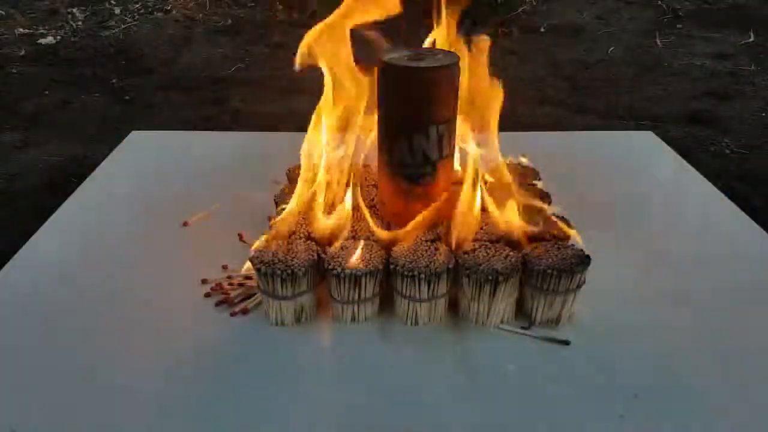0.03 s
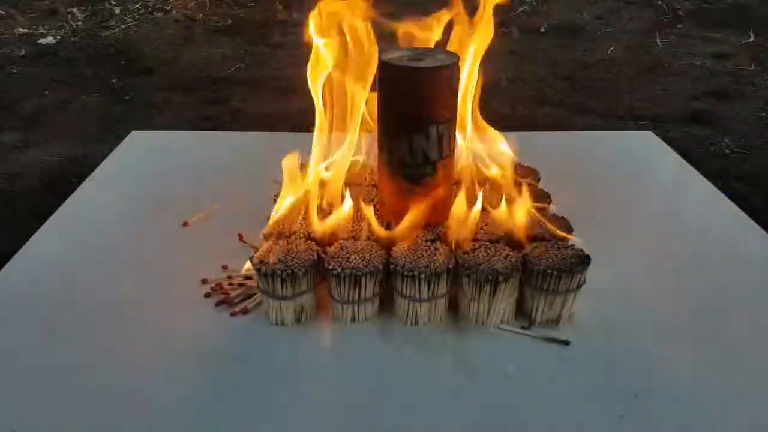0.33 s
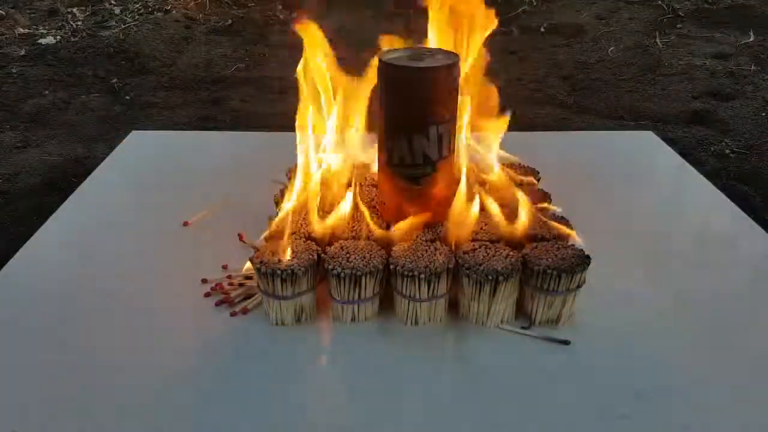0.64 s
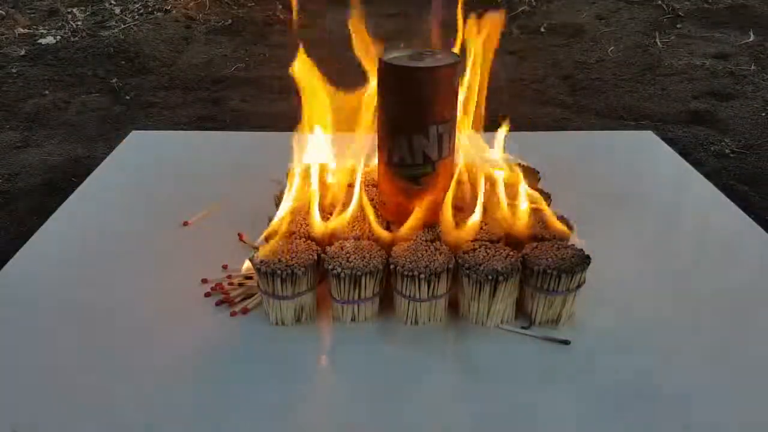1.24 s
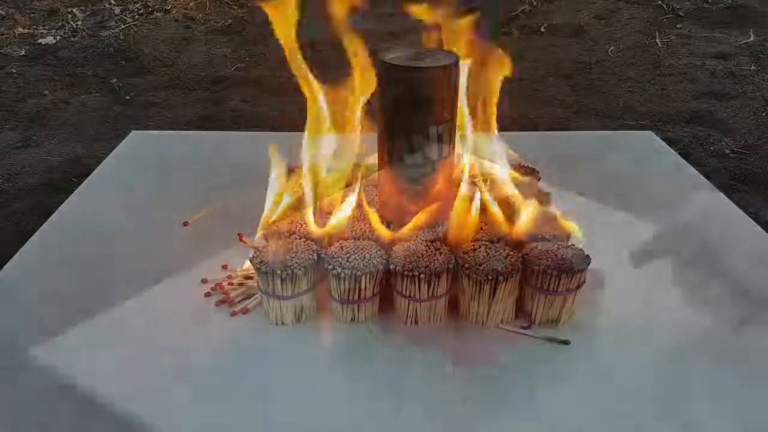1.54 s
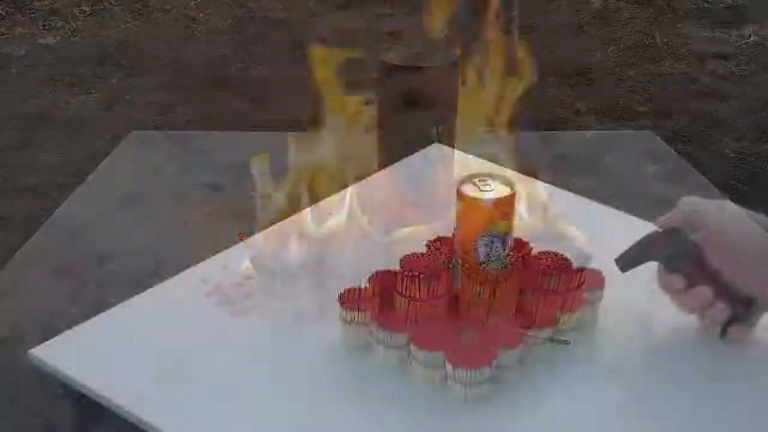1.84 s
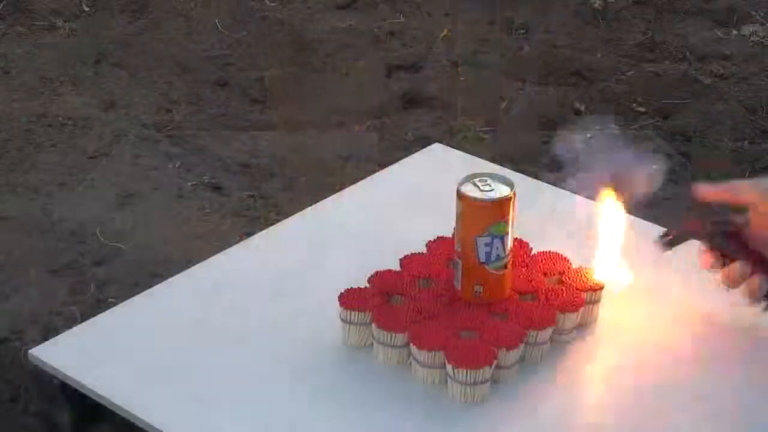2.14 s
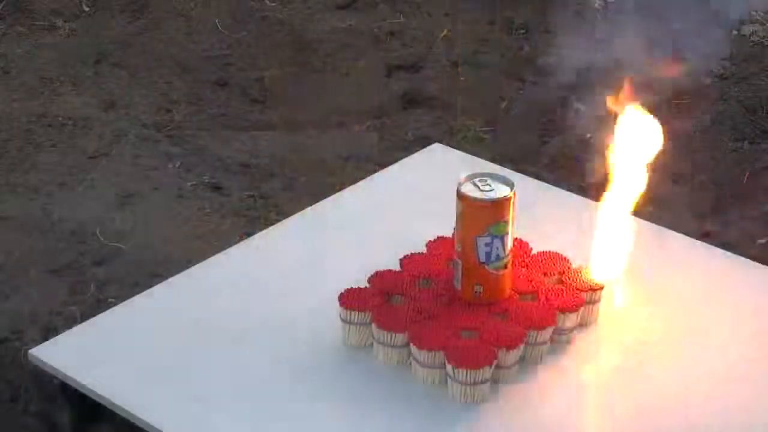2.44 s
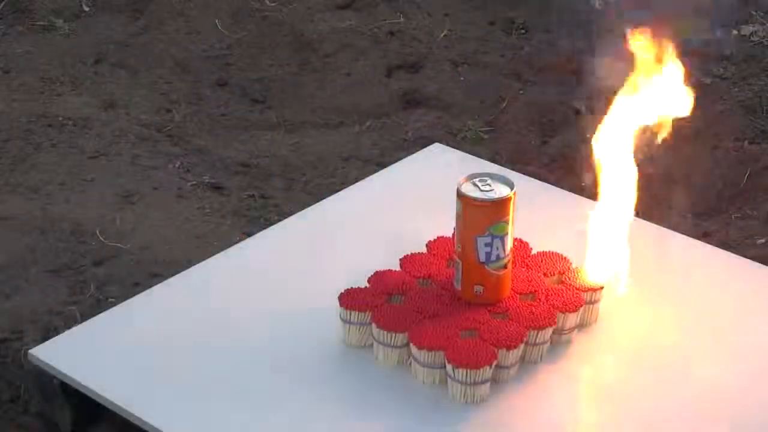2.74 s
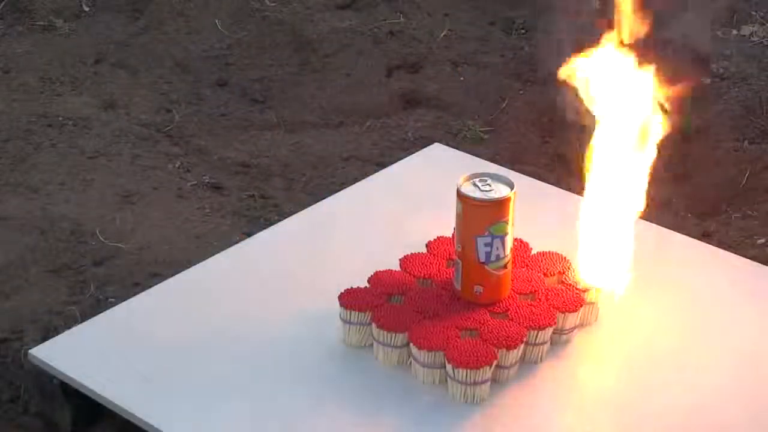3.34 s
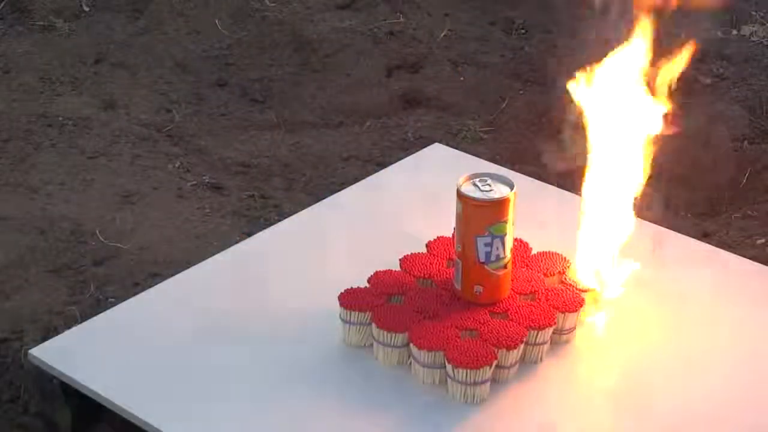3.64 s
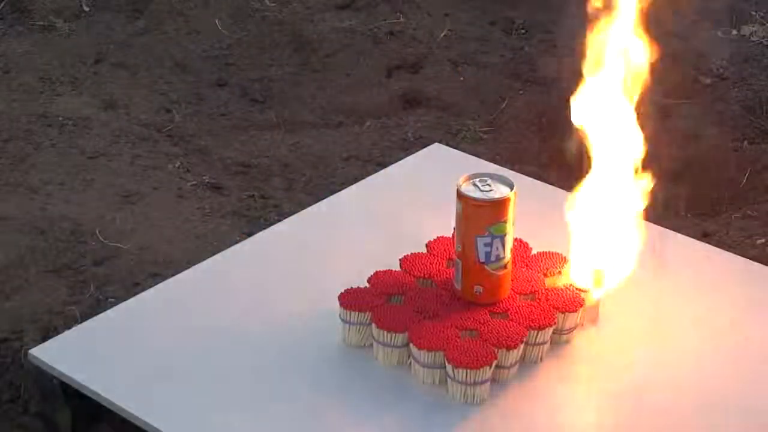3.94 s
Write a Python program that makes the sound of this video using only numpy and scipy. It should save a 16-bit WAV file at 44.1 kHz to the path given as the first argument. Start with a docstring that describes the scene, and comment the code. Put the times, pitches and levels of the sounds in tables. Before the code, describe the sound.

Match heads ignite one after another, close by in the open air. Quiet flame flutter and a few ticks come first, then a lighter's click, a fizz and a pop that grows into a sputtering roar.

```python
"""Bundles of matches burn down on a table outdoors: soft flame flutter, a few ticks, a faint low hum.
At 1.8 s a lighter clicks and rasps, and fresh match heads start to fizz. They catch with a sharp pop
at 2.2 s and the flame leaps up with a hollow whump. From there on, head after head ignites in a
hissing, snapping, roaring jet, coloured by the hard surfaces around it; near the end the roar swoops."""
import sys
import numpy as np
from scipy import signal
from scipy.fft import rfft, irfft, next_fast_len
from scipy.io import wavfile
from scipy.ndimage import map_coordinates

SR = 44100
rng = np.random.default_rng(int(sys.argv[2]) if len(sys.argv) > 2 else 0)


def dump_mix(stems):
    """Bounce the given channels to the path in sys.argv[1] as a 16-bit WAV at rate SR."""
    frames = np.atleast_2d(stems).T  # one column per channel
    limited = np.clip(frames, -1, 1)  # hard clip at full scale
    pcm = np.round(limited * 32767).astype(np.int16)
    wavfile.write(sys.argv[1], SR, pcm)


N = 176400

# stereo image of the close sources, nearly mono: f/Hz, left-right likeness
NARROW = [(100, .998), (400, 0.99), (1300, 0.96), (2400, 0.97), (4400, 0.92), (12000, 0.98)]
# stereo image of the background, open in the treble: f/Hz, left-right likeness
WIDE = [(60, 1), (200, 0.9), (400, 0.49), (800, 0.16), (2000, 0.099), (6000, 0.11), (12000, 0.18)]


def amp(db):
    """Decibels to gain."""
    return 10 ** (np.asarray(db) / 20)


def unit(x):
    """Scale to rms 1."""
    return x / np.sqrt(np.mean(x ** 2) + 1e-20)


def along(points, hz):
    """Read a curve of (f/Hz, value) points on a log frequency axis."""
    f, v = np.transpose(points)
    return np.interp(np.log(hz + 1), np.log(f + 1), v)


def since(s):
    """Seconds since s, for every sample."""
    return np.arange(N) / SR - s


def fader(points):
    """Gain per sample from (t/s, level/dB) points."""
    return amp(np.interp(since(0), *np.transpose(points)))


def pan_right(db):
    """Stereo gains: left down and right up by db."""
    return amp(db * np.array([[-1], [1]]))


def wobble(per_s):
    """A smooth random curve with per_s knots a second."""
    return map_coordinates(rng.standard_normal(2000), [since(0) * per_s], mode="wrap")


def burst(s, rise, hold, t60):
    """Envelope from s: linear rise, exponential release after hold; all in seconds."""
    t = since(s)
    return np.clip(t / rise, 0, 1) * np.exp(-np.log(1000) * np.maximum(t - hold, 0) / t60)


def ring(modes, s, rise):
    """Damped resonances set off at s."""
    return sum(amp(db) * burst(s, rise, rise, t60) * np.sin(2 * np.pi * hz * since(s))
               for hz, db, t60 in modes)


def filtered(x, response):
    """Shape x with a frequency response."""
    size = next_fast_len(N + SR // 4)
    return irfft(rfft(x, size) * response(np.fft.rfftfreq(size, 1 / SR)), size)[..., :N]


def coloured(x, response, image=NARROW):
    """Two unrelated signals become a stereo pair of rms 1 with the given response and image."""
    def mid_side(hz):
        angle = np.arccos(np.clip(along(image, hz), 0, .999)) / 2
        return response(hz) * np.array([np.cos(angle), np.sin(angle)])
    mid, side = filtered(x, mid_side)
    return unit(np.array([mid + side, mid - side]))


def noise(eq, peaks=(), image=NARROW):
    """Stereo noise with a broad EQ curve and narrow resonances."""
    def response(hz):
        peaks_db = sum(db / (1 + (2 * (hz - centre) / width) ** 2) for centre, width, db in peaks)
        return amp(along(eq, hz) + peaks_db)
    return coloured(rng.standard_normal((2, N)), response, image)


def grains(eq, per_s):
    """A dense shower of tiny, equally strong clicks at random times."""
    hits = rng.random(N) < per_s / SR
    polarity = np.sign(rng.standard_normal((2, N)))
    return coloured(hits * polarity, lambda hz: amp(along(eq, hz)))


def scattered(x, length_s=.03, echo_db=-7):
    """Steady noise combed by weak reflections from the table, can and ground; rms 1."""
    size = int(length_s * SR)
    echo = rng.standard_normal(size) * np.linspace(1, 0, size)
    echo *= amp(echo_db) / np.linalg.norm(echo)
    return unit(x + signal.fftconvolve(x, echo[None], axes=1)[:, :N])


def patchy(x, depth_db=1, patch_hz=902, patch_s=.09):
    """Shifting colour: bands of x swell and fade at random, each on its own."""
    hz, t, spectrum = signal.stft(x, SR, nperseg=512)
    grid = np.meshgrid(hz / patch_hz, t / patch_s, indexing="ij")
    swells = map_coordinates(rng.standard_normal(size=(64, 128)), grid, mode="wrap")
    return unit(signal.istft(spectrum * amp(depth_db * swells))[1][:, :N])


def outdoors(left_lead_s=.00014):
    """A bed of wide air and low flame rumble, with a midrange swell around the lighter's strike."""
    # EQ of each layer: f/Hz, level/dB
    air_eq = [(60, -19), (200, -2), (380, -2.5), (450, -5), (800, -5), (1200, -7), (1600, -7.5),
              (2000, -12), (3000, -14.5), (4000, -17.5), (7000, -18), (9000, -26.5), (12000, -19),
              (15500, -18.5)]
    rumble_eq = [(20, -6), (35, -18), (55, -4), (75, -2), (95, -8.5), (135, -4.5), (153, -13.5),
                 (180, -9.5), (200, -15.5), (260, -15.5), (600, -81), (2000, -120)]
    swell_eq = [(200, -17), (400, -1), (700, 0), (1100, 3.5), (1600, -5), (2500, -17), (4000, -31),
                (9000, -31)]
    # fader rides: t/s, level/dB
    air_ride = [(0, -63.5), (.65, -64), (1.1, -64.5), (1.5, -65.5), (2.1, -66.5)]
    swell_ride = [(0, -86), (1.3, -73), (1.68, -63.5), (2, -62), (2.3, -86)]
    air = fader(air_ride) * noise(air_eq, image=WIDE)
    rumble = noise(rumble_eq, image=WIDE) * amp(-63 + 2.2 * wobble(11))
    lead_s = left_lead_s / 2 * np.array([[1], [-1]])
    bed = filtered(air + rumble, lambda hz: np.exp(2j * np.pi * hz * lead_s))
    return bed + fader(swell_ride) * noise(swell_eq)


def hum(fade_in_s=0.09, drift_rad=0.23):
    """Two low tones waver faintly under everything."""
    # hum tones: f/Hz, level/dB, start/s
    tones = [(70.6, -72, 0.2), (168.1, -71.5, 0.87)]
    out = np.zeros(N)
    for hz, db, start in tones:
        tone = np.sqrt(2) * np.sin(2 * np.pi * hz * since(0) + drift_rad * wobble(4.52))
        fade_in = np.clip(since(start) / fade_in_s, 0, 1)
        out += amp(db + 0.59 * wobble(5.9)) * fade_in * tone
    return out


def embers(thud_s=.5745, thud_width_s=.00035):
    """Burning sticks tick now and then, and one pops dully."""
    # ticks of the burning wood: t/s, level/dB
    tick_cues = [(0.4789, -49.5), (.486, -57), (0.5988, -60), (0.6503, -54.5)]
    # their bright EQ: f/Hz, level/dB
    tick_eq = [(1200, -16), (4000, -7), (6000, 0.5), (8500, -10), (11000, -4), (15500, -14)]
    ticks = sum(amp(db) * burst(s, rise=0.00016, hold=0.00034, t60=0.0066) for s, db in tick_cues)
    thud = -amp(-48) * np.exp(-(since(thud_s) / thud_width_s) ** 2)
    return ticks * noise(tick_eq, image=WIDE) + thud


def puffs(lowpass_hz=1500):
    """Flames flap in short, low swells of air."""
    # soft puffs: t/s, level/dB, centre f/Hz, half-length/s, band slope/(dB per octave)
    puff_cues = [(.17, -61.5, 73.6, 0.12, 26), (0.806, -55.5, 72, 0.028, 27), (1.171, -63, 75, 0.13, 13),
                 (1.762, -57, 378, 0.0063, 15), (1.88, -57.5, 170, .05, 23), (2.557, -52, 637, 0.016, 32),
                 (2.869, -52, 393, 0.04, 45), (3.06, -59.5, 168, 0.081, 31), (3.86, -55.5, 75, 0.049, 6)]
    out, size = np.zeros(N + SR), SR // 2
    hz, t = np.fft.rfftfreq(size, 1 / SR), np.arange(size) / SR
    for s, db, centre, half_length, slope in puff_cues:
        band = amp(-slope * np.abs(np.log2((hz + 1) / centre))) / (1 + (hz / lowpass_hz) ** 4)
        air = unit(irfft(rfft(rng.standard_normal(size)) * band, size))
        start = max(round(s * SR) - size // 2, 0)
        swell = np.exp(-((t + start / SR - s) / half_length) ** 2) * np.sqrt(np.hanning(size))
        out[start:start + size] += amp(db) * swell * air
    return out[:N]


def lighter():
    """Over a thin hiss, the striker catches in a few clicks, then rasps and dies away."""
    # striker clicks: t/s, level/dB, t60/s
    click_cues = [(1.8135, -52, .02), (1.8163, -24.5, 0.0032), (1.819, -40, .004), (1.822, -32.5, 0.0076),
                  (1.8283, -31, .005), (1.8312, -27, .007)]
    # thin hiss as the lighter nears: t/s, level/dB
    gas_ride = [(1.6, -110), (1.72, -73), (1.81, -72), (2.05, -67), (2.2, -100)]
    # EQ of each layer: f/Hz, level/dB
    steel_eq = [(1200, -34), (4000, -9), (6600, 2), (9000, -4), (10300, 1), (12000, -14), (13800, -19),
                (15500, -26)]
    rasp_eq = [(600, -20), (1500, -12.5), (2100, -6.5), (3200, -8.5), (4000, 0), (4600, -3.5), (5800, 2),
               (6500, 4), (7800, -5.5), (8800, 2), (10700, 0.5), (12000, -6.5), (13500, -17), (15500, -28)]
    tail_eq = [(1000, -2), (2300, -3), (3200, -4), (4000, -3), (4700, -6), (6400, 9), (7700, -1),
               (10500, -3), (12500, -15), (15500, -13)]
    gas_eq = [(3000, -23), (5200, -7), (6800, -3), (8800, -10), (9800, -3), (10400, 1), (11200, -7),
              (15500, -10)]
    strikes = sum(amp(db) * burst(s, rise=0.00028, hold=0.00082, t60=t60) for s, db, t60 in click_cues)
    clicks = strikes * noise(steel_eq)
    stroke = dict(s=1.818, rise=.013, hold=0.039)
    rasp = amp(-34 + 1.25 * wobble(600)) * burst(**stroke, t60=0.23) * scattered(noise(rasp_eq))
    tail = amp(-51.5) * burst(**stroke, t60=0.69) * scattered(noise(tail_eq))
    gas = fader(gas_ride) * noise(gas_eq)
    return (clicks + rasp + tail + gas) * pan_right(0.66)


def ignition():
    """The first heads burst with a ringing crack and a spit of gas; then the flame leaps up."""
    # bursting heads: t/s, crack level/dB, spit level/dB, spit t60/s
    pop_cues = [(2.2389, -24, -38, 0.17), (2.244, -32, -39.5, 0.21), (2.3646, -44, -52, .06)]
    # EQ of crack and spit: f/Hz, level/dB
    crack_eq = [(500, -41), (1350, -8), (1800, -7), (3500, -2), (4800, 4.5), (6500, 0.5), (9000, -4),
                (10200, -5), (11300, 8), (12600, -10), (15500, -21)]
    spit_eq = [(800, -20), (1350, -1.5), (2600, 0), (3400, 3), (4100, -4), (4700, 3.5), (6000, -1),
               (9300, -3), (11200, 2.5), (12600, -13), (15500, -21)]
    # ring of the first burst and hollow whump of the flame: f/Hz, level/dB, t60/s
    pop_modes = [(1313, -38.5, .07), (1424, -39.5, .08), (2050, -45, 0.088)]
    whump_modes = [(350, -39.5, 0.15), (243, -50, 0.041)]
    crack = sum(amp(db) * burst(s, rise=0.00035, hold=0.00076, t60=0.012) for s, db, _, _ in pop_cues)
    spit = sum(amp(db) * burst(s, rise=0.0024, hold=0.0022, t60=t60) for s, _, db, t60 in pop_cues)
    pops = crack * noise(crack_eq) + spit * scattered(noise(spit_eq))
    ping = ring(pop_modes, s=pop_cues[0][0], rise=0.0018)
    whump = ring(whump_modes, s=2.3185, rise=0.0074)
    return pops * pan_right(.5) + ping + whump


def swoop(half_width_hz=190):
    """A band of turbulence in the roar dives in pitch and comes back up."""
    # path of the band: t/s, centre f/Hz, level/dB
    sweep = [(3.771, 753, -73), (3.792, 603, -50.5), (3.805, 424, -50), (3.82, 186, -45.5),
             (3.843, 321, -51), (3.856, 480, -51), (3.885, 650, -77)]
    s, hz, db = np.transpose(sweep)
    phase = 2 * np.pi * np.cumsum(np.interp(since(0), s, hz)) / SR
    churn = unit(filtered(rng.standard_normal((2, N)), lambda f: 1 / (1 + (f / half_width_hz) ** 4)))
    envelope = amp(np.interp(since(0), s, db, left=-np.inf, right=-np.inf))
    return envelope * (churn[0] * np.cos(phase) + churn[1] * np.sin(phase))


def snaps(t60=0.0012, band_hz=(1800, 10500)):
    """Single heads snap: tiny sharp cracks that stand out of the hiss."""
    # snapping heads: t/s, level/dB
    snap_cues = [(2.167, -26), (2.4299, -31), (2.924, -30), (3.013, -34), (3.0993, -30), (3.184, -24),
                 (3.585, -28)]
    out, t = np.zeros(N), np.arange(SR // 200) / SR
    for s, db in snap_cues:
        out[round(s * SR):][:len(t)] += amp(db - 60 * t / t60) * rng.standard_normal(len(t))
    return signal.sosfilt(signal.butter(4, band_hz, btype="band", fs=SR, output="sos"), out)


def flare():
    """Head after head ignites: sputtering hiss over the rush and roar of a flickering jet."""
    # fader rides of the high hiss, mid rush and low roar: t/s, level/dB
    hiss_ride = [(1.85, -110), (1.97, -75), (2.06, -59), (2.13, -48.5), (2.2, -47.5), (2.32, -50.5),
                 (2.48, -49), (2.56, -46), (2.62, -50.5), (2.75, -48.5), (2.92, -45.5), (3.1, -47.5),
                 (3.45, -46), (3.62, -44.5), (3.7, -47.5), (3.88, -46.5), (4, -48)]
    rush_ride = [(1.75, -110), (1.9, -60), (2.06, -63), (2.14, -51), (2.23, -48.5), (2.36, -49),
                 (2.45, -51.5), (2.56, -48.5), (2.66, -51), (2.78, -50), (2.88, -44.5), (3.02, -45),
                 (3.14, -49), (3.21, -46.5), (3.34, -50), (3.47, -48), (3.56, -49.5), (3.62, -45),
                 (3.68, -48.5), (3.88, -45.5), (4, -48.5)]
    roar_ride = [(1.6, -100), (1.85, -63.5), (2.03, -58), (2.13, -53), (2.3, -49.5), (2.48, -51),
                 (2.64, -53), (2.8, -51), (2.9, -47), (3.12, -48.5), (3.35, -51.5), (3.55, -49.5),
                 (3.8, -47.5), (4, -50)]
    # their EQ: f/Hz, level/dB
    hiss_eq = [(2500, -16.5), (4200, -13), (5200, -4.5), (6500, 0.5), (7800, -3.5), (9300, -2),
               (10300, 1.5), (11200, -0.5), (12000, -5.5), (13000, -13.5), (15500, -17.5)]
    rush_eq = [(600, -25), (1100, -2), (2000, 0), (2700, -1), (3700, -2), (4300, -3.5), (5200, -8),
               (7000, -30)]
    roar_eq = [(25, -52), (70, 1.5), (125, -6), (150, -9), (205, -9), (260, -1), (305, -6), (360, 2),
               (480, -3.5), (560, 0.5), (800, -1), (1000, -3.5), (1400, -7.5), (3000, -67)]
    # treble sizzle, and resonances among table and can: f/Hz, width/Hz, boost/dB
    sizzle_peaks = [(5370, 83, 5.5), (6430, 150, 2.5), (10200, 120, 1.5), (10950, 120, 2.5),
                    (11400, 400, 3)]
    surface_peaks = [(168, 18, 8), (341, 24, 8), (394, 24, 4), (426, 26, 5), (650, 30, 7), (750, 24, 4),
                     (928, 26, 4), (1060, 130, 5), (1463, 45, 10), (1695, 34, 11), (1851, 45, 6),
                     (1974, 48, 8), (2250, 44, 6), (2344, 38, 7), (2745, 70, 5), (3084, 50, 8),
                     (3478, 50, 10), (3660, 38, 10), (3872, 50, 8), (4069, 60, 6), (4543, 65, 8),
                     (4920, 65, 7)]
    flicker = amp(0.26 * wobble(21.17))
    fizz = noise(hiss_eq, sizzle_peaks)
    sputter = amp(-14) * grains(hiss_eq, per_s=710)
    hiss = fader(hiss_ride) * patchy(scattered(fizz + sputter)) * pan_right(.5)
    rush = fader(rush_ride) * patchy(noise(rush_eq, surface_peaks)) * amp(0.54 * wobble(90))
    roar = fader(roar_ride) * noise(roar_eq, surface_peaks) * amp(0.63 * wobble(25.39))
    return flicker * (hiss + rush + roar)


def scene():
    """The quiet burn, the lighter and the flare-up, all heard close."""
    return outdoors() + hum() + embers() + puffs() + lighter() + ignition() + flare() + swoop() + snaps()


def record(dry):
    """A brick-wall low-pass trims the very top."""
    return filtered(dry, lambda hz: hz < 15800)


dry = scene()
out = record(dry)
dump_mix(out)
```